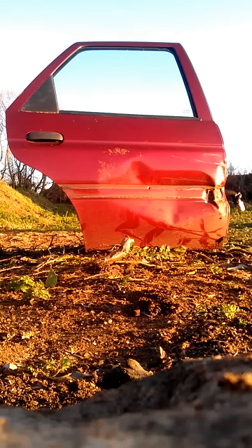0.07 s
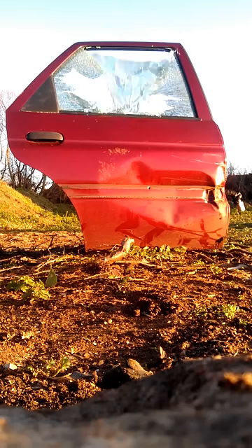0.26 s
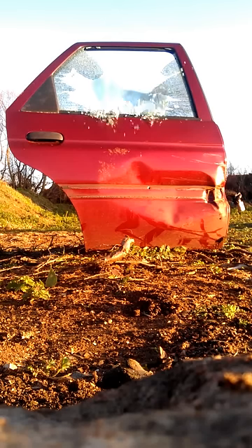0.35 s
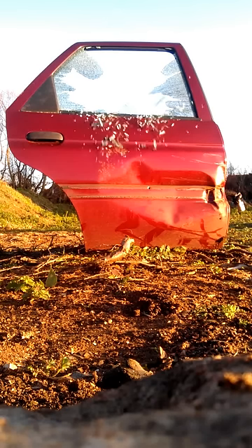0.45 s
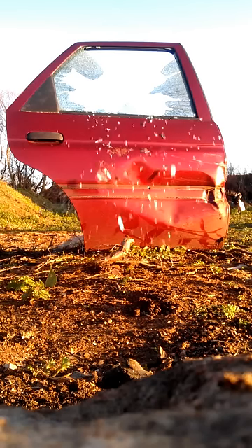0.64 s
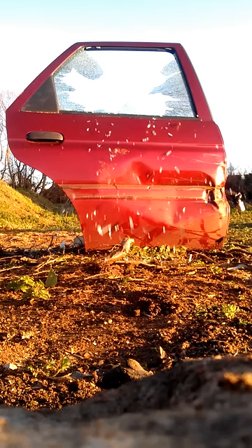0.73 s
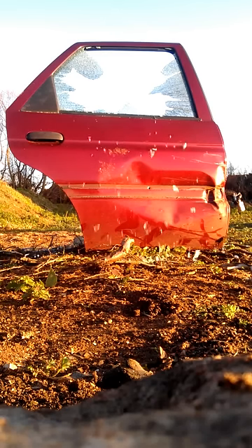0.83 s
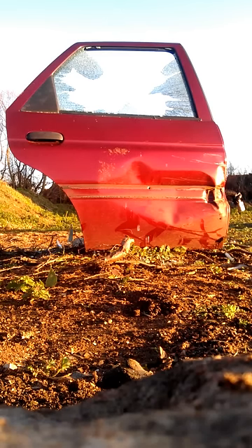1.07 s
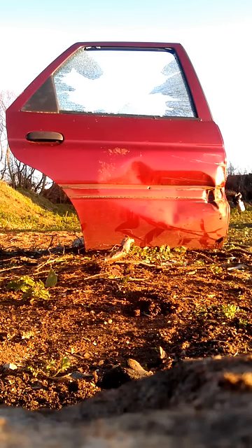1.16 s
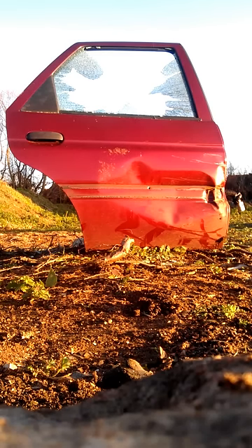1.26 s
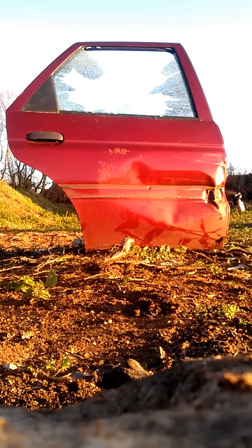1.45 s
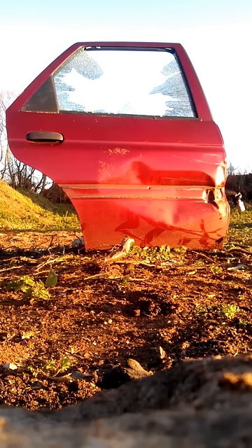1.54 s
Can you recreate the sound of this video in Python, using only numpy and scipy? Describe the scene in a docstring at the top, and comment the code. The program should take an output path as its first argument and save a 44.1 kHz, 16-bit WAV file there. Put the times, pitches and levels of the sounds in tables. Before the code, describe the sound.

A car window shatters: a quick swish, hard crack and thump, then a dense bright shower of glass crumbs knocking on the hollow metal door, thinning to sparse ticks; outdoors, close microphone, loud peaks distorted.

```python
"""Smashing a car door window

Outdoors, an earlier sound dies away and a small rustle follows. Something swishes through the air and smashes
the side window of a lone car door: shaped noise, a crack, a thump of falling pitch and a shudder. The pane
crumbles into a dense shower: small decaying rings for the glass, random knocks through resonances for the
hollow door skin. It thins into clumps, ringing knocks and late ticks. Far traffic hums; loud peaks clip."""
import sys
import numpy as np
from scipy import signal
from scipy.fft import rfft, irfft, next_fast_len
from scipy.io import wavfile

SR = 44100
rng = np.random.default_rng(int(sys.argv[2]) if len(sys.argv) > 2 else 0)


def volts(x):
    """Linear amplitude factor 10**(x/20) for a level x in dB, scalar or array-like."""
    e = np.asarray(x, float) / 20
    return 10 ** e


def unload_wav(signal):
    """Save mono or channel-first audio to the path in sys.argv[1] as 16-bit WAV at rate SR, clipped to [-1, 1]."""
    wavfile.write(
        sys.argv[1],
        SR,
        np.round(np.clip(np.atleast_2d(signal).T, -1, 1) * 32767).astype(np.int16),
    )


N = 70560
T = np.arange(N) / SR  # s


def unit(x):
    """Normalisation: a signal divided by its root mean square has rms 1."""
    return x / np.sqrt(np.mean(x ** 2) + 1e-20)


def filtered(x, response):
    """Linear filtering: the spectrum is multiplied by a response, a function of frequency in Hz."""
    size = next_fast_len(N + 8192)
    hz = np.fft.rfftfreq(size, 1 / SR)
    return irfft(rfft(x, size) * response(hz), size)[..., :N]


def colour(points):
    """Spectral envelope: gain in dB is interpolated between points on a logarithmic frequency axis."""
    point_hz, gain_db = np.transpose(points)
    return lambda hz: volts(np.interp(np.log(hz + 1), np.log(point_hz + 1), gain_db))


def noise(points):
    """Coloured noise: white noise through a spectral envelope, brought to rms 1."""
    return unit(filtered(rng.standard_normal(N), colour(points)))


def level(rows, column=1):
    """Amplitude envelope: straight lines in dB between points, -120 dB outside them."""
    columns = np.transpose(rows)
    return volts(np.interp(T, columns[0], columns[column], -120, -120))


# Spectral shape of the far hum: frequency_hz, relative_density_db
AIR_COLOUR = [(60, -47.5), (200, -18), (350, -9), (930, -7), (1360, -13), (1490, -12.5), (1800, -23.5),
              (9000, -29.5), (15600, -26.5)]


def far_traffic():
    """Stationary noise: the far traffic is a steady hum, heard as coloured noise."""
    return volts(-51.5) * noise(AIR_COLOUR)


# Loudness of the swish before the blow: time_s, level_db
SWISH_LEVEL = [(.15, -57), (.177, -45.5), (.194, -21), (.201, -14), (.21, -3.5), (.222, -20.5), (.231, -12),
               (.238, -32), (.248, -32), (.256, -73)]
# Spectral shape of the swish: frequency_hz, relative_density_db
SWISH_COLOUR = [(180, -43), (300, -26.5), (1420, 4.5), (2080, 6), (2700, 3), (9660, 3.5), (15600, -11)]


def swish():
    """Aerodynamic noise: an object moving through air gives broadband noise that swells and fades."""
    return level(SWISH_LEVEL) * noise(SWISH_COLOUR)


# Spectral shape of the crack: frequency_hz, relative_density_db
CRACK_COLOUR = [(200, -29), (1000, -3), (2100, 0), (3600, -20), (8000, -23.5), (15000, -8)]


def crack():
    """Impulsive noise: the blow begins with a very short broadband burst."""
    start_s, length_s, level_db = .2319, .0046, -2
    gate = (T > start_s) & (T < start_s + length_s)
    return gate * volts(level_db) * noise(CRACK_COLOUR)


def thump():
    """Frequency glide: a decaying sine whose pitch falls exponentially; phase is the integral of pitch."""
    start_s, t60_s, level_db = .23575, .015, 14.5
    start_hz, end_hz, fall_s = 2530, 230, .00083
    u = (T - start_s).clip(0)
    turns = end_hz * u + (start_hz - end_hz) * fall_s * (1 - np.exp(-u / fall_s))
    return volts(level_db - 60 * u / t60_s) * np.sin(2 * np.pi * turns)


# Loudness of the door's shudder before the pane lets go: time_s, level_db
SHUDDER_LEVEL = [(.266, -65.5), (.27, -43), (.271, -15), (.29, -17.5), (.305, -21.5)]
# Spectral shape of the shudder: frequency_hz, relative_density_db
SHUDDER_COLOUR = [(59, -41.5), (100, -2.5), (403, 10), (601, -1), (882, -7), (1960, -20.5), (3000, -17),
                  (3900, -55)]


def shudder():
    """Forced vibration: the struck door shakes, heard as low and middle noise under an envelope."""
    return level(SHUDDER_LEVEL) * noise(SHUDDER_COLOUR)


# Single crumbs: start_s, peak_db (nominal: the noise has half this amplitude as its rms at onset), pitch_hz
TICKS = [(1.1905, -19, 9500), (1.198, -15, 9400), (1.2032, -20, 7600), (1.3759, -17.5, 9460),
         (1.381, -15, 9430), (1.3844, -20, 9560), (1.404, -22.5, 9700), (1.491, -33, 13900)]


def ticks():
    """Band-limited transients: a lone crumb gives a short bright click gathered round one pitch."""
    t60_s, width_octaves = .011, .2
    out = np.zeros(N)
    for start_s, peak_db, pitch_hz in TICKS:
        def band(hz):
            skirt = 0.32 * np.sqrt(hz / pitch_hz) * (hz > 2300)
            octaves = np.log2((hz + 1) / pitch_hz)
            return skirt + np.exp(-.5 * (octaves / width_octaves) ** 2)

        hiss = unit(filtered(rng.standard_normal(N), band))
        decay = volts(peak_db - 60 * (T - start_s).clip(0) / t60_s)
        out += (T >= start_s) * decay * .5 * hiss
    return out


# Larger pieces ringing one spot of the door: start_s, level_db (main tone before onset and low cut), pitch_hz
KNOCKS = [(.3, -3, 3040), (.312, 0, 1433), (0.333, 2, 2935), (0.388, -1.5, 3080), (0.413, -2.5, 2980),
          (0.433, 3, 2960), (0.454, -0.5, 1480), (0.462, 0, 1474), (0.471, -2, 1515), (0.514, -7, 1460),
          (.772, -5.5, 1443), (0.541, 1.5, 350), (0.583, -4, 1550), (.808, -5.5, 800), (0.814, -12, 165),
          (0.9596, 2, 1460), (1.0055, -2, 758), (1.013, -10, 640), (1.021, -11.5, 558), (1.071, -19, 410),
          (1.109, -26, 600), (1.202, -30.5, 522), (1.391, -27.5, 1520), (1.4675, -25.5, 1450),
          (1.473, -27, 1470), (1.472, -28.5, 2036)]


def knocks():
    """Modal ringing: each larger piece excites a strong door tone and a weak one near it."""
    t60_s, dull_t60_s = .029, .022  # above 1000 Hz, and at or below it
    out = np.zeros(N)
    for start_s, level_db, pitch_hz in KNOCKS:
        u = (T - start_s).clip(0)
        neighbour_hz = pitch_hz * rng.uniform(0.89, 1.086)
        pair = np.sin(2 * np.pi * pitch_hz * u) + 0.085 * np.sin(2 * np.pi * neighbour_hz * u)
        decay = volts(level_db - 60 * u / (t60_s if pitch_hz > 1000 else dull_t60_s))
        onset = 1 - np.exp(-u * pitch_hz * 2)
        out += decay * onset * pair
    # the knocks carry little below about 130 Hz
    return filtered(out, lambda hz: 1 / (1 + (129.6 / (hz + 1)) ** 4))


# The continuous shower: time_s, crumbs_level_db, skin_level_db
SHOWER = [(.262, -63, -79), (.271, -29, -54), (.292, -24, -29), (.305, -20, -33), (.46, -10, -11),
          (.65, -13, -15.5), (.8, -17.5, -18.5), (1.02, -37, -24.5), (1.06, -32, -47.5), (1.2, -44.5, -54),
          (1.23, -52, -66), (1.29, -53.5, -69.5)]
# Bursts of clatter: an earlier sound dying away at the start, a small rustle, then clumps of glass landing:
# peak_s, bright_peak_db (lowered by the crest below), dull_level_db, t60_s
BURSTS = [(0, -25, -31.5, 0.14), (0.075, -34, -59.5, 0.2), (.2955, -6, -39, 0.079), (0.302, 2, -4.5, 0.16),
          (0.331, 2.5, -9, 0.29), (0.387, -1, -8, 0.14), (.436, -1, -9, 0.076), (0.459, 2.5, -9.5, 0.1),
          (0.545, 0, -3.5, 0.023), (0.589, 0.5, -6.5, 0.041), (0.616, -0.5, -36, 0.11),
          (0.663, 0.5, -8, 0.023), (0.749, 0, -24, 0.055), (0.799, -11.5, -16.5, 0.094),
          (0.814, 1.5, -10, 0.052), (0.853, -0.5, -23.5, 0.15), (0.886, 0, -8.5, 0.09),
          (.927, 2, -9.5, 0.1), (0.954, -3.5, -21, 0.059), (0.961, 2.5, -6, 0.11), (0.993, -6, -18, 0.14),
          (1.013, -9, -18.5, 0.068), (1.037, -9, -21, 0.068), (1.07, -11, -26.5, 0.12),
          (1.0794, -7, -27.5, 0.037), (1.11, -8.5, -27, 0.07), (1.138, -10, -28.5, 0.066),
          (1.165, -15.5, -51, 0.1), (1.185, -16, -40, 0.084), (1.3054, -23, -45.5, 0.066),
          (1.35, -33, -57.5, .07), (1.391, -20, -28, 0.066), (1.402, -26, -41, 0.084),
          (1.4303, -42, -37.5, .05), (1.467, -35.5, -34.5, 0.046), (1.472, -38, -33, 0.069)]


def activity(column):
    """Energy summation: powers of shower and bursts add; column 1 drives the rings, 2 the skin."""
    crest_db = 10.5 if column == 1 else 0  # peak over rms of the rings
    power = level(SHOWER, column) ** 2
    for row in BURSTS:
        peak_s, t60_s = row[0], row[3]
        u = T - peak_s
        # bursts in the thick shower build up; the others strike at once (dB per s)
        rise = 1301.5 if .31 < peak_s < .95 else 7999.5
        below_db = np.where(u < 0, -u * rise, 60 * u / t60_s)
        power = power + volts(2 * (row[column] - crest_db - below_db))
    return np.sqrt(power)


def contacts(per_s, spread_db):
    """Random impacts: uniformly scattered samples, skewed sizes with a few much larger, and a free draw."""
    draw = rng.random((int(per_s * N / SR), 3))
    at = (draw[:, 0] * N).astype(int)
    strength = volts(-spread_db * np.log(draw[:, 1] + 0.0093))
    return at, strength, draw[:, 2]


# Broad spectral shape of the door skin: frequency_hz, gain_db
SKIN_COLOUR = [(60, -60), (150, -17), (300, -10), (790, -3.5), (1450, -3), (2120, -2.5), (4500, -4.5),
               (6000, -38)]
# Resonances of the door skin: frequency_hz, width_hz, gain_db
DOOR_MODES = [(350, 300, 4), (593, 130, 2), (823, 240, -2.5), (1460, 124, 8), (2414, 120, 0.5),
              (2940, 155, 6.5)]


def door():
    """Source and filter: falling glass knocks the sheet metal, which answers in its resonances.

    The same filter gives the dull part of the sounds before the blow."""
    at, strength, pick = contacts(per_s=2500, spread_db=4.5)
    impacts = np.bincount(at, strength * np.sign(pick - .5), N)
    drive = impacts + 1.48 * rng.standard_normal(N)

    def skin(hz):
        modes = 0.99  # direct part
        for mode_hz, width_hz, gain_db in DOOR_MODES:
            damping = 1j * hz * width_hz
            modes = modes + volts(gain_db) * damping / (mode_hz ** 2 - hz ** 2 + damping)
        return colour(SKIN_COLOUR)(hz) * modes

    return filtered(drive * activity(2), skin) / np.std(filtered(drive, skin))


# Spectral shape of the clinking glass: frequency_hz, gain_db
GLASS_COLOUR = [(1470, -34.5), (2660, -17.5), (2980, -1), (4210, -4), (4870, 3), (6610, -5), (7590, -0.5),
                (10200, -3), (11600, -12.5), (15600, -12)]


def pieces(per_s, life_s, size):
    """Granular superposition: each contact lays down a brief soft-edged ring of size samples."""
    at, strength, pick = contacts(per_s, spread_db=2)
    pitch_hz = (2200 + 14000 * pick ** 1.4)[:, None]
    k = np.arange(size)
    turns = k * pitch_hz / SR
    envelope = np.exp(-k / SR / life_s) * (1 - np.exp(-turns / 2))
    grains = strength[:, None] * np.sin(2 * np.pi * turns) * envelope
    places = (at[:, None] + k).ravel()

    def lay(rings):
        return filtered(np.bincount(places, rings.ravel(), N + size)[:N], colour(GLASS_COLOUR))

    # the even rain of grains sets the reference level
    return lay(grains * activity(1)[at][:, None]) / np.std(lay(grains))


def crumbs():
    """Size and damping: many tiny crumbs die at once; fewer larger shards ring longer.

    The same grains give the bright part of the sounds before the blow."""
    tiny = pieces(per_s=15000, life_s=.00039, size=120)
    shards = pieces(per_s=1300, life_s=.003, size=600)
    return tiny + volts(-5.5) * shards


def scene():
    """Superposition: the pressures of all sources add, in one channel."""
    blow = swish() + crack() + thump() + shudder()
    clatter = ticks() + knocks() + door() + crumbs()
    return (far_traffic() + blow + clatter)[None]


def roll_off(x):
    """The treble ends steeply here."""
    return signal.sosfilt(signal.butter(12, 15750, fs=SR, output="sos"), x)


def record(dry):
    """Nonlinear distortion: the microphone clips softly and unevenly, then its band is limited."""
    ceiling, hardness, lopsided = .98, 3.5, .57
    x = dry / (1 + np.abs(dry / ceiling) ** hardness) ** (1 / hardness)
    x = x + lopsided * x ** 4 * (1 - x ** 2)  # an even term bends both polarities the same way
    mix = filtered(x, lambda hz: (hz < 15750) * hz / (hz + 30))
    return roll_off(mix)


dry = scene()
out = record(dry)
unload_wav(out)
```